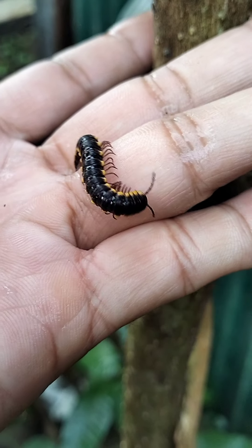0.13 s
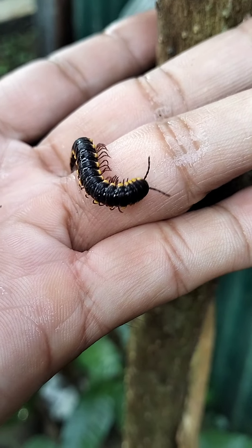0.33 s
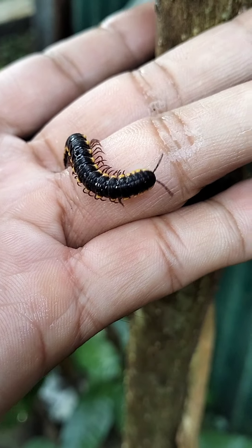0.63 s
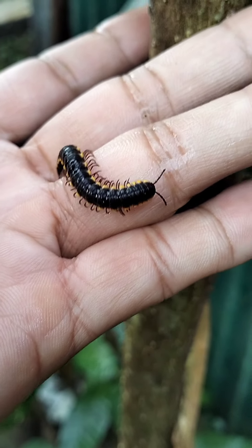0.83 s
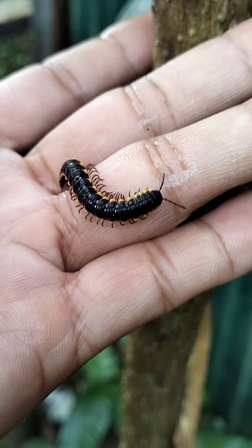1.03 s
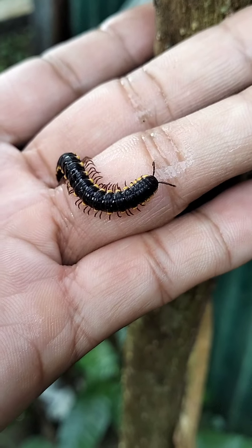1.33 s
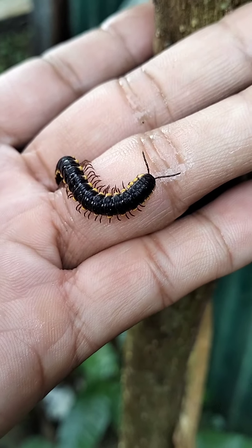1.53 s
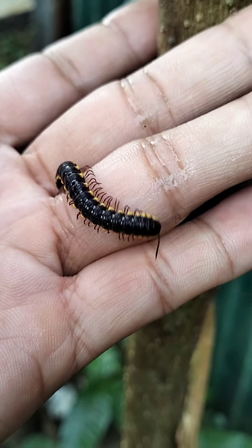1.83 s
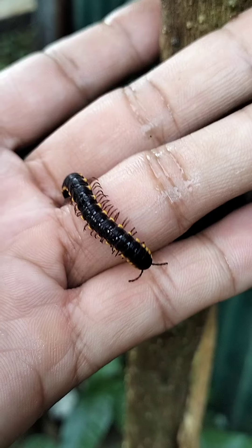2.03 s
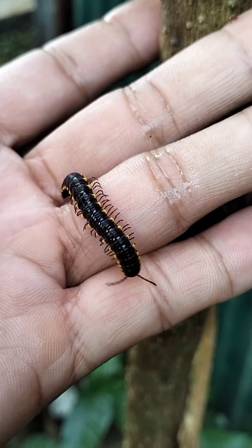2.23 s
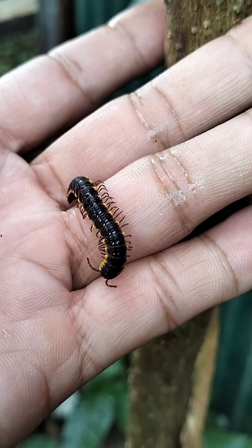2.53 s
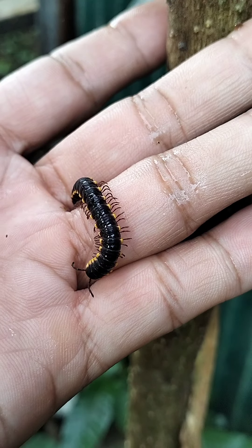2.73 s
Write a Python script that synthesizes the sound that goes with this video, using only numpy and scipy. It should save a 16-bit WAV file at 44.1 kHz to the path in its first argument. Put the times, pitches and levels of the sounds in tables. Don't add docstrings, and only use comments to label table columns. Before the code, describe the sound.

A cricket trills in two high bursts outdoors, with a loud metallic scrape between and bird chirps

```python
import sys
import numpy as np
from scipy import signal
from scipy.io import wavfile

SR = 44100
rng = np.random.default_rng(int(sys.argv[2]) if len(sys.argv) > 2 else 0)


def attenuation_scalar(level_db):
    decades = np.asarray(level_db, float) / 20
    return 10 ** decades


def to_wav(s):
    ch = np.atleast_2d(s).T
    pcm = np.round(np.clip(ch, -1, 1) * 32767)
    wavfile.write(sys.argv[1], SR, pcm.astype(np.int16))


N = 126567

# first wing stroke t/s, last t/s, strokes per second f/Hz
CRICKET_BURSTS = [
    (-.0062, .9911, 45.12),
    (1.459, 2.5637, 45.26),
]
CRICKET_LEVELS = [-56, -56]
# t/s, level/dB, brightness f/Hz
GATE_DRAG = [
    (1.207, -71, 2300),
    (1.251, -56, 2300),
    (1.27, -47.5, 2330),
    (1.34, -45, 2100),
    (1.42, -43, 1777),
    (1.5, -46.5, 1733),
    (1.63, -47.5, 1674),
    (1.698, -56.5, 1606),
]
# f/Hz, width/Hz, level/dB
GATE_BARS = [(566, 47, -5), (683.5, 60, 0.5), (824, 122, -3.5), (1034, 97, -5), (1178, 250, -15),
             (1473, 75, -10.5), (1700, 100, -17), (1950, 170, -18)]
# t/s, length/s, from f/Hz, to f/Hz, level/dB
GATE_SQUEALS = [
    (1.25, 0.054, 690, 686, -41),
    (1.41, 0.035, 1030, 1005, -44),
    (1.464, 0.022, 1015, 1005, -48.5),
    (1.27, 0.06, 1240, 1260, -50),
    (1.265, 0.044, 1080, 1110, -46.5),
    (1.295, .03, 710, 760, -50.5),
    (1.258, 0.058, 2080, 1880, -64),
    (1.43, 0.052, 1720, 1690, -62),
    (1.52, 0.078, 1470, 1450, -64),
]
# t/s, peak level/dB, answering bar f/Hz
GATE_JOLTS = [(1.233, -43, 762), (1.255, -36.5, 682), (1.295, -34.5, 775), (1.324, -36.5, 690),
              (1.343, -40, 1135), (1.367, -36.5, 686), (1.395, -34, 763), (1.43, -32, 1025),
              (1.447, -34.5, 946), (1.466, -40.5, 1006), (1.494, -42, 710), (1.514, -38, 694),
              (1.55, -40.5, 677), (1.562, -38.5, 662), (1.574, -37, 675), (1.606, -36.5, 858),
              (1.629, -43, 623)]
# t/s, length/s, from f/Hz, to f/Hz, level/dB
SPARROW_CHIRPS = [(.045, 0.032, 4910, 4120, -68.5), (.068, 0.015, 4410, 3737, -53),
                  (.11, 0.032, 4170, 3580, -69), (.215, .04, 4350, 4000, -70.5),
                  (.515, 0.031, 4330, 3940, -70), (.61, 0.056, 4640, 3440, -63),
                  (.94, 0.02, 4230, 3900, -74), (1.012, 0.014, 4410, 4290, -67.5),
                  (1.12, 0.07, 4240, 5370, -65), (1.14, 0.035, 3630, 3580, -68.5),
                  (1.15, 0.029, 5170, 4540, -64), (1.172, 0.019, 4377, 3925, -54.5),
                  (1.19, 0.026, 4900, 4410, -59), (1.208, 0.017, 4144, 3835, -55.5),
                  (1.235, .022, 3643, 4330, -52), (1.745, 0.047, 4520, 3645, -60),
                  (2.028, 0.023, 4167, 3695, -54.5), (2.385, 0.038, 4580, 3407, -63.5),
                  (2.49, 0.036, 4300, 4180, -79), (2.638, 0.0164, 3860, 4980, -63.5),
                  (2.66, .02, 4980, 4160, -65), (2.685, 0.019, 4507, 3736, -58),
                  (2.72, 0.02, 4195, 3630, -65)]
# t/s, number of notes, level/dB
WARBLER_PHRASES = [
    (.048, 1, -71),
    (.105, 3, -64.5),
    (0.352, 3, -65.5),
    (0.621, 1, -66),
    (.662, 2, -63.5),
    (0.869, 3, -65),
]
# t/s, length/s, from f/Hz, to f/Hz,
# level/dB
HIGH_CHIPS = [
    (1.152, 0.017, 5850, 5700, -66.5),
    (1.185, .018, 5200, 5650, -70),
    (2.653, 0.028, 5720, 5640, -70),
    (2, 0.029, 5600, 5300, -74),
    (2.012, 0.0145, 4300, 5000, -72),
]
# t/s, length/s, from f/Hz, to f/Hz, level/dB
WHISTLER_AND_DOVE = [(.1, 0.027, 3450, 3040, -76), (.125, 0.018, 3090, 3000, -69),
                     (.16, 0.03, 2740, 2580, -72), (.21, 0.026, 2680, 2483, -69),
                     (.22, 0.035, 3100, 3290, -73), (.295, 0.035, 2153, 1970, -67.5),
                     (.295, 0.03, 3070, 2980, -75), (.345, 0.069, 1950, 2356, -74.5),
                     (.39, 0.058, 2380, 2750, -70), (.46, 0.031, 2820, 2210, -67.5),
                     (.5, 0.042, 2700, 3010, -77), (.555, 0.057, 1700, 2090, -73),
                     (.595, 0.04, 2077, 2154, -78), (1.08, 0.076, 3050, 3070, -76),
                     (1.36, 0.058, 3360, 3070, -74.5), (1.69, .025, 3350, 3320, -75.5),
                     (2.07, 0.041, 3200, 2830, -85), (.53, 0.059, 713, 689, -62.5),
                     (.68, 0.036, 710, 650, -65.5)]
# t/s, f/Hz, level/dB
SWOOP_PATH = [(2.48, 3140, -70), (2.51, 3150, -84), (2.527, 3140, -68), (2.57, 3240, -82),
              (2.585, 3200, -90), (2.606, 3190, -77), (2.635, 3130, -90), (2.699, 3270, -73.5),
              (2.735, 3080, -90), (2.786, 3100, -63), (2.816, 2930, -61), (2.845, 2510, -67.5),
              (2.87, 2150, -65)]
# t/s, length/s, lowest f/Hz, highest f/Hz, level/dB
LEAF_RUSTLES = [
    (0.706, 0.053, 6500, 8400, -83),
    (1.046, 0.023, 6400, 8700, -73),
    (1.408, 0.027, 6400, 8600, -78),
    (2.793, 0.035, 5700, 8470, -77),
    (1.73, 0.0094, 1500, 5500, -77.5),
    (2.363, 0.0052, 2580, 5250, -74.5),
    (2.442, 0.024, 596, 4600, -72.5),
    (2.443, 0.013, 7050, 11600, -76.5),
    (2.455, .015, 496, 800, -66.5),
    (2.465, 0.0088, 8600, 11300, -83),
]
# t/s, f/Hz, time to fade by 60 dB/s, level/dB
TWIG_TICKS = [
    (2.364, 4600, 0.013, -60),
    (2.364, 2260, 0.074, -64),
    (2.364, 9500, .02, -64.5),
    (2.442, 618, .06, -46),
    (2.442, 1253, 0.06, -57.5),
    (2.448, 3460, 0.017, -53),
    (2.445, 2200, 0.013, -71),
]
# f/Hz, width/Hz, level/dB, throb level/dB
FAR_INSECTS = [(6585, 340, -79.5, -1), (4166, 610, -75.5, 4), (8200, 650, -85, -0.5)]
# t/s, level/dB over its mean
TRAFFIC_SWELL = [(0, 1.5), (.42, 1.5), (.62, 2), (.72, -3.5), (1.3, -2.5), (1.5, 2.5), (2.1, 0.5),
                 (2.28, -5.5), (2.47, 0.5), (2.56, -4.5), (2.7, 3), (2.87, 7)]
# f/Hz, level/dB
AIR_SPECTRUM = [(12, -38), (20, -13), (64, 1), (138, -0.5), (213, -12), (841, -25.5), (1270, -28.5),
                (2070, -45.5), (3400, -40.5), (4420, -98), (7480, -120)]
# f/Hz, level/dB
HISS_SPECTRUM = [(3000, -18.5), (5800, -10.5), (7200, -19.5), (8300, -6.5), (9200, -35), (11000, -9),
                 (13300, 1.5), (16000, 1.5)]


def rms_one(x):
    return x / np.sqrt(np.mean(x ** 2) + 1e-20)


def drift(rate):
    r = np.exp(-80 * np.pi * rate / SR)
    noise = rng.standard_normal(N // 40 + 2002)
    slow = signal.lfilter([1], [1, -2 * r, r * r], noise)[2000:]
    return np.interp(np.arange(N) / 40, np.arange(len(slow)), rms_one(slow))


def resonate(x, hz, width):
    r = np.exp(-np.pi * width / SR)
    return signal.lfilter([1, 0, -1], [1, -2 * r * np.cos(2 * np.pi * hz / SR), r * r], x) * (1 - r * r) / 2


def resonant_noise(hz, width):
    noise = rng.standard_normal(N)
    return rms_one(resonate(resonate(noise, hz, width), hz, width))


def band(x, low_hz, high_hz):
    sos = signal.butter(2, [low_hz, min(high_hz, .45 * SR)], "band", fs=SR, output="sos")
    return signal.sosfilt(sos, x)


def scatter(x, t60, hold):
    t = np.arange(2 * SR) / SR
    tail = rng.standard_normal(2 * SR) * attenuation_scalar(-60 * np.maximum(t - hold, 0) / t60)
    return signal.fftconvolve(x, tail / np.sqrt(np.sum(tail ** 2)))[:N]


def add(out, s, x):
    i = int(s * SR)
    out[i:i + len(x)] += x[:N - i]


def ping(hz, t60):
    t = np.arange(int(t60 * SR)) / SR
    return np.sin(2 * np.pi * hz * t) * attenuation_scalar(-60 * t / t60)


def notes(rows, warble_hz):
    out, flutter = np.zeros(N), warble_hz * drift(260)
    for s, length, from_hz, to_hz, db in rows:
        t = np.arange(int(length * SR)) / SR
        glide = from_hz + (to_hz - from_hz) * t / length
        hz = glide + np.roll(flutter, -int(s * SR))[:len(t)]
        shape = np.sin(np.pi * t / length) ** 0.62
        add(out, s, attenuation_scalar(db + 5.5) * shape * np.sin(2 * np.pi * np.cumsum(hz) / SR))
    return out * attenuation_scalar(4 * drift(113) - 2.0)


def cricket():
    wing_hz, rise_hz, swell_db = 6742, 333.3, 11.5
    rise_share, open_share, close_share = .25, 0.16, 0.21
    t, out = np.arange(N) / SR, np.zeros(N)
    for (first, last, rate), db in zip(CRICKET_BURSTS, CRICKET_LEVELS):
        turns = (t - first) * rate
        u = turns % 1
        stroke = np.clip(turns, 0, 60).astype(int)
        spread = rng.standard_normal((61, 2))[stroke]
        hz = wing_hz + 7 * spread[:, 0] + 6 * drift(3.6) - rise_hz * np.exp(-u / rise_share)
        shape = np.clip(u / open_share, 0, 1) * np.clip((1 - u) / close_share, 0, 1) ** 2.4
        level = attenuation_scalar(db + 6.5 - swell_db * (1.5 - u) + spread[:, 1] + 0.7 * drift(100))
        sounding = (t > first) & (t < last)
        out += level * shape * np.sin(2 * np.pi * np.cumsum(hz) / SR) * sounding
    return out + attenuation_scalar(-8) * scatter(out, 0.36, 0.02)


def gate():
    slips_per_s, slip_jitter, slip_hiss, flicker_db = 52, .12, 3.5, 3
    s, db, bright_hz = np.transpose(GATE_DRAG)
    t = np.arange(N) / SR
    slip_count = np.floor(np.cumsum(slips_per_s * (1 + slip_jitter * drift(10))) / SR)
    slips = np.diff(slip_count, prepend=0)
    drive = rms_one(slips * attenuation_scalar(2.2 * drift(45))) + slip_hiss * rng.standard_normal(N)
    bright = np.interp(t, s, bright_hz)
    bars = np.zeros(N)
    for k, (hz, width, bar_db) in enumerate(GATE_BARS):
        ring = resonate(resonate(drive, hz, width), hz, 3.04 * width) / np.sqrt(width)
        dulling = 1 + (hz / bright) ** 16
        bars += (-1) ** k * attenuation_scalar(bar_db + flicker_db * drift(12.2)) * ring / dulling
    grind = rms_one(bars) * attenuation_scalar(np.interp(t, s, db, -120, -120) - 2.5)
    rings = notes(GATE_SQUEALS, 21.7) + jolts()
    to_echo = grind + attenuation_scalar(-8.5) * rings
    slope_echo = attenuation_scalar(-23.5) * np.roll(scatter(to_echo, 0.19, .02), int(.7 * SR))
    valley_echo = attenuation_scalar(-5.5) * scatter(to_echo, 1.93, 0.038)
    return grind + rings + slope_echo + valley_echo


def jolts():
    out, cracks = np.zeros(N), np.zeros(N)
    for s, db, hz in GATE_JOLTS:
        add(out, s, attenuation_scalar(db - 6.5) * ping(hz, 0.089))
        cracks[int(s * SR)] = attenuation_scalar(db - 1)
    return band(out, 420, 1700) + band(band(band(cracks, 630, 1600), 630, 1600), 630, 1600)


def birds():
    note_gap_s, note_s, from_hz, to_hz = .037, 0.0337, 5476, 4610
    trill_rows = [(s + k * note_gap_s, note_s, from_hz, to_hz, db)
                  for s, count, db in WARBLER_PHRASES for k in range(round(count))]
    trill = notes(trill_rows, 164.0) + notes(HIGH_CHIPS, 60.)
    sparrows = notes(SPARROW_CHIRPS, 110)
    whistles = notes(WHISTLER_AND_DOVE, 44.0)
    direct = attenuation_scalar(-3) * sparrows + attenuation_scalar(-5) * trill + attenuation_scalar(-4) * whistles
    flock = sparrows + attenuation_scalar(-2) * whistles
    direct += scatter(trill, 0.18, 0.023) + swoop()
    near_trees = scatter(flock, 0.23, 0.033)
    deep_wood = attenuation_scalar(-8) * scatter(flock, 0.61, 0.097)
    return direct + near_trees + deep_wood


def swoop():
    s, hz, db = np.transpose(SWOOP_PATH)
    t = np.arange(N) / SR
    level = attenuation_scalar(np.interp(t, s, db, -120) + 1 + 4 * drift(56))
    pitch = np.interp(t, s, hz) + 45 * drift(120)
    tone = level * np.sin(2 * np.pi * np.cumsum(pitch) / SR)
    return tone + attenuation_scalar(1) * scatter(tone, 0.15, 0.045)


def rustles():
    out = np.zeros(N)
    for s, length, low_hz, high_hz, db in LEAF_RUSTLES:
        t = np.arange(int(3 * length * SR)) / SR
        fade = np.minimum(1, np.exp((length - t) / (.35 * length)))
        grain = rng.standard_normal(SR // 2)[:len(t)] * fade
        add(out, s, attenuation_scalar(db) * rms_one(band(band(grain, low_hz, high_hz), low_hz, high_hz)))
    for s, hz, t60, db in TWIG_TICKS:
        add(out, s, attenuation_scalar(db) * ping(hz, t60))
    return out


def insect_chorus():
    out = np.zeros(N)
    for hz, width, db, throb_db in FAR_INSECTS:
        out += attenuation_scalar(db + throb_db * drift(9.0)) * resonant_noise(hz, width)
    return out


def traffic():
    t = np.arange(N) / SR
    engine = resonant_noise(148.1, 16.2) * attenuation_scalar(-55.5 - 3.5 * t)
    rumble = resonant_noise(70.5, 40) * attenuation_scalar(-58 + np.interp(t, *np.transpose(TRAFFIC_SWELL)))
    return rumble + engine


def coloured(spectrum, patchy_db):
    hz, db = np.transpose(spectrum)
    white, out = rng.standard_normal((2, N)), 0
    edges = 20 * 2 ** np.arange(0, 10, 1 / 4)
    for k, (low, high) in enumerate(zip(edges, edges[1:])):
        level = np.interp(np.log(low * high) / 2, np.log(hz), db, -90, -90)
        out = out + attenuation_scalar(level + patchy_db * drift(6.7)) * band(white[k % 2], low, high)
    return rms_one(out)


def air_and_hiss():
    air = attenuation_scalar(-55) * coloured(AIR_SPECTRUM, patchy_db=1.5)
    hiss = attenuation_scalar(-72.5) * coloured(HISS_SPECTRUM, patchy_db=0.3)
    return air + hiss


def scene():
    floor = air_and_hiss()
    insects = cricket() + insect_chorus()
    return (insects + traffic() + birds() + gate() + rustles() + floor)[None]


def band_limit(x):
    return signal.sosfilt(signal.butter(12, 15900, fs=SR, output="sos"), x)


def record(dry):
    return band_limit(dry)


dry = scene()
out = record(dry)
to_wav(out)
```